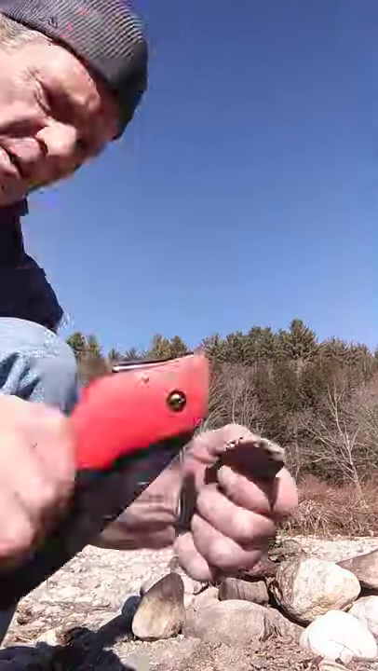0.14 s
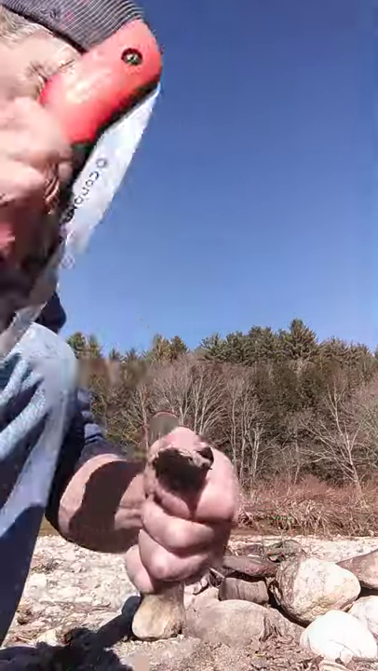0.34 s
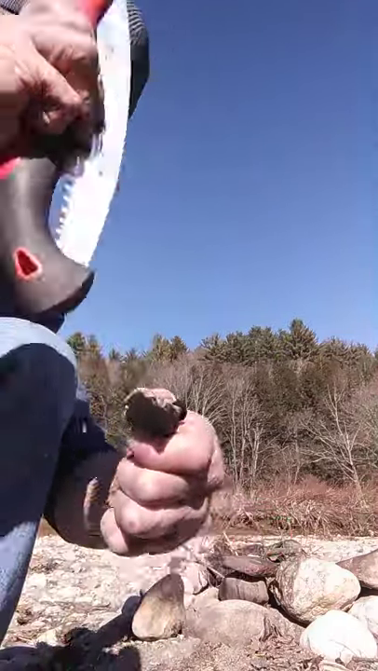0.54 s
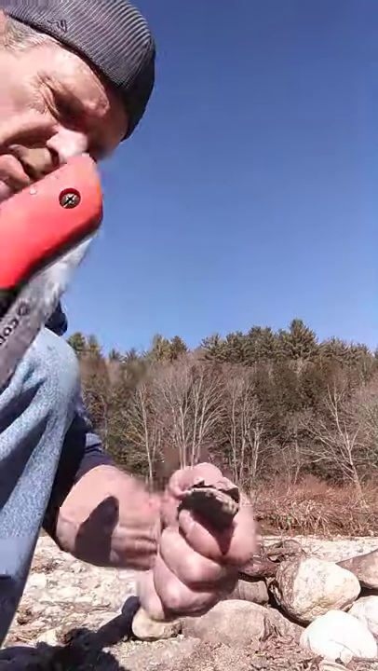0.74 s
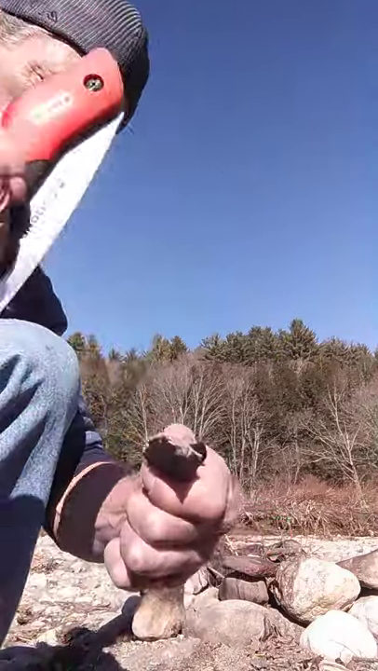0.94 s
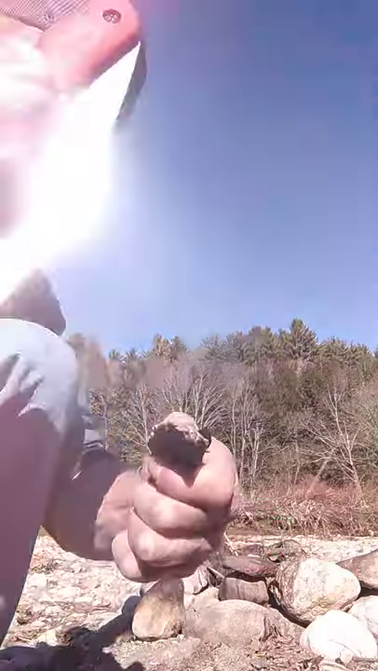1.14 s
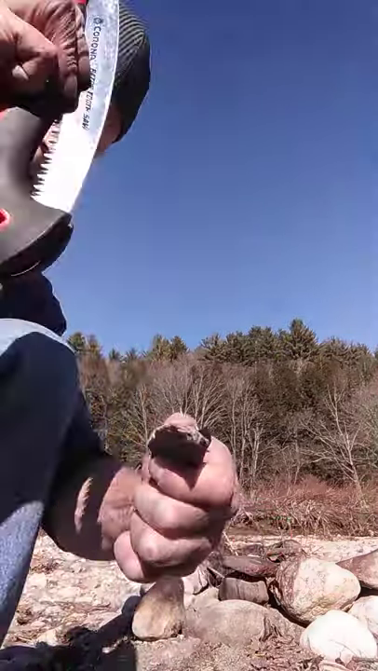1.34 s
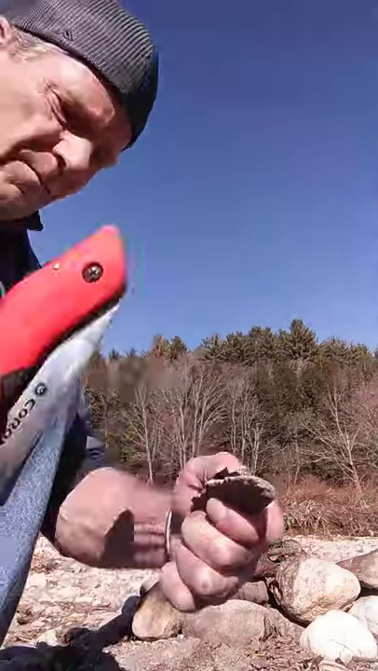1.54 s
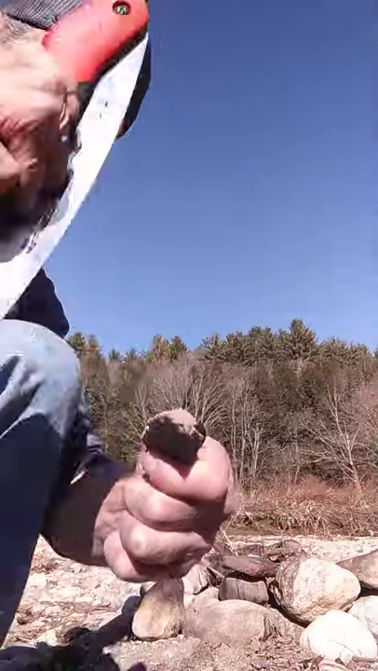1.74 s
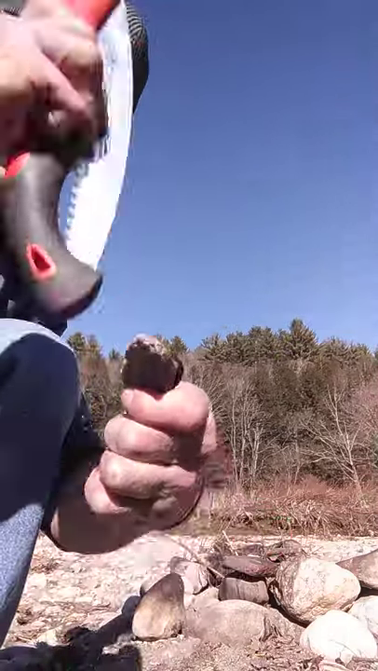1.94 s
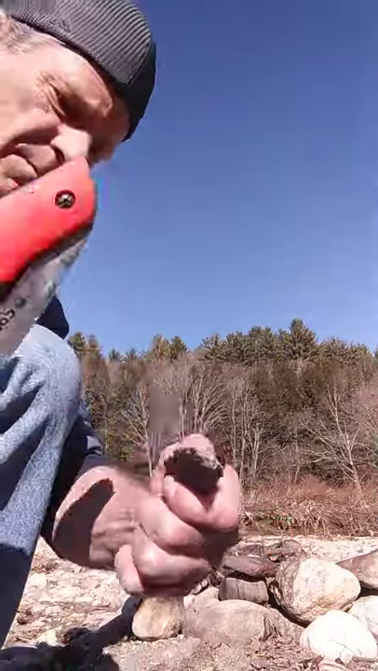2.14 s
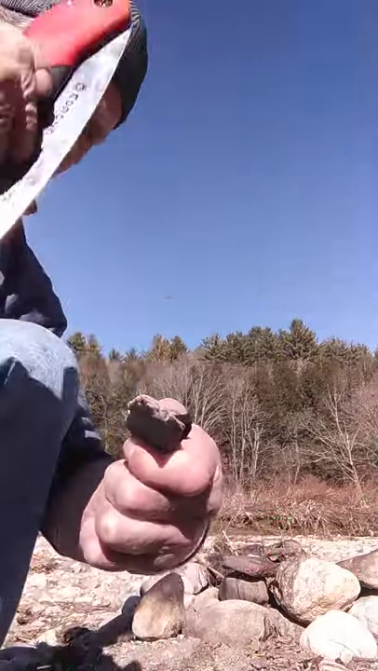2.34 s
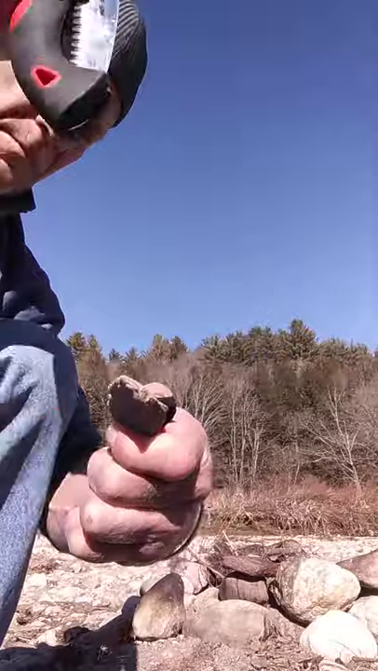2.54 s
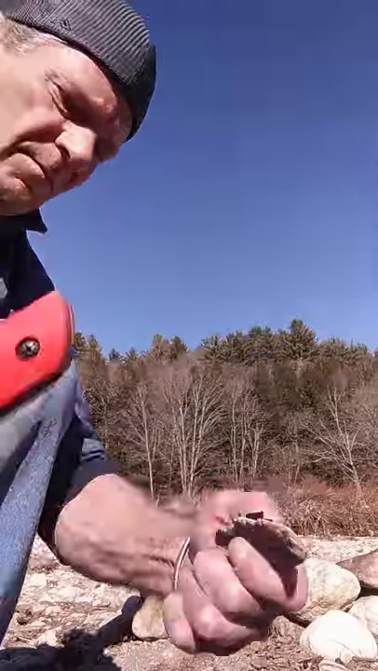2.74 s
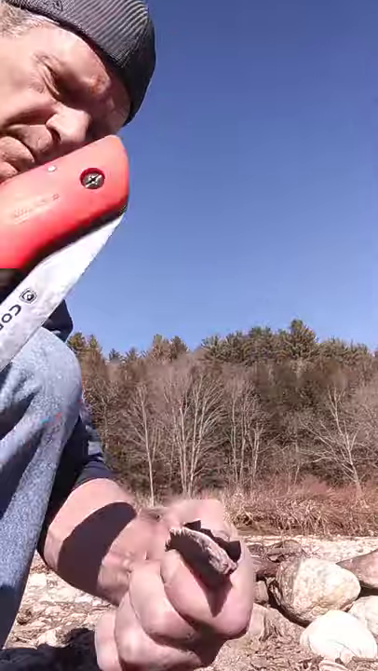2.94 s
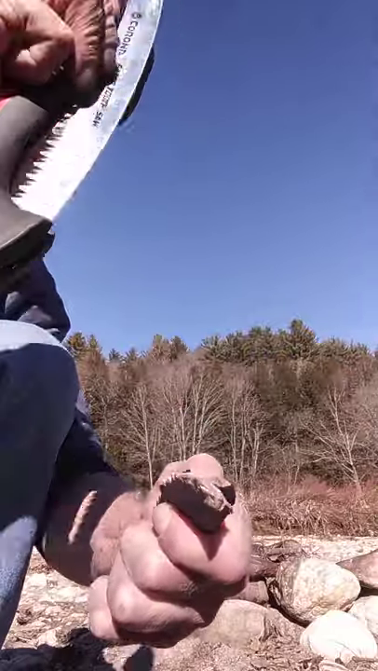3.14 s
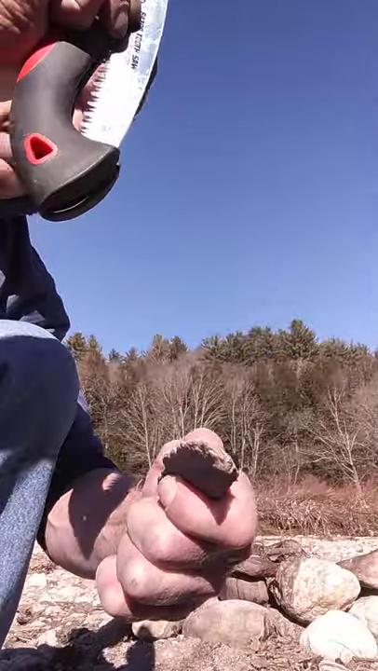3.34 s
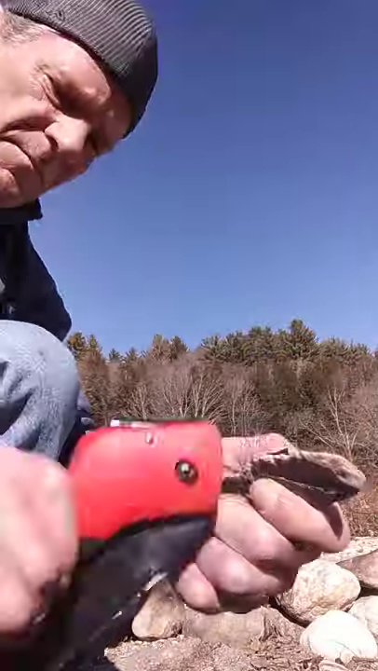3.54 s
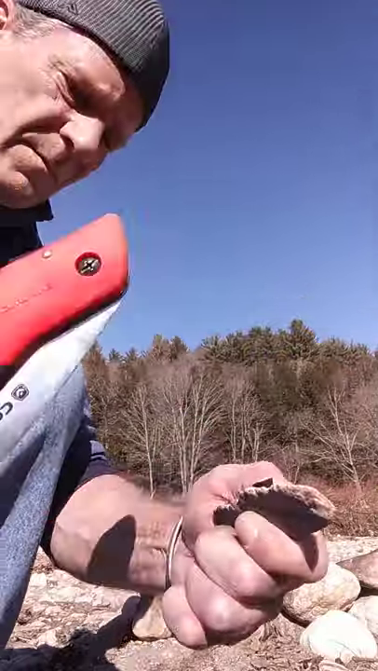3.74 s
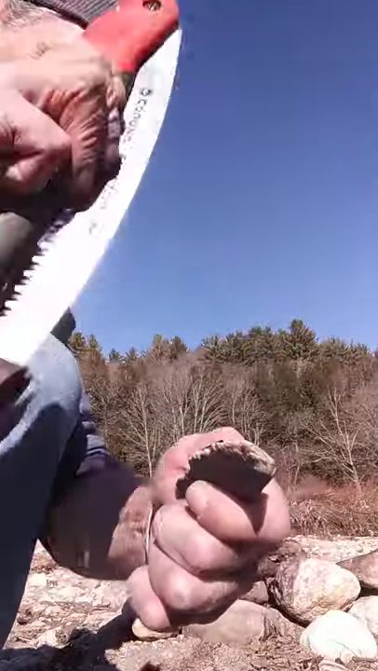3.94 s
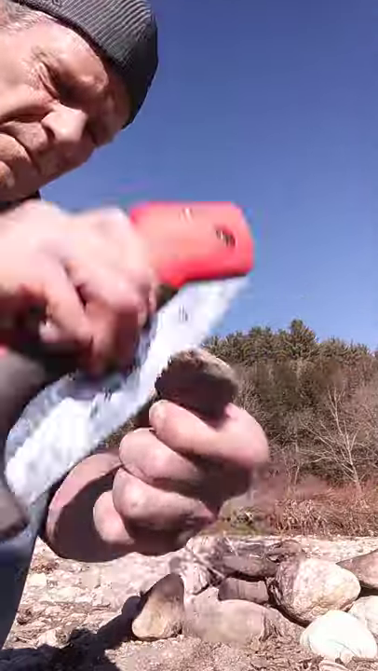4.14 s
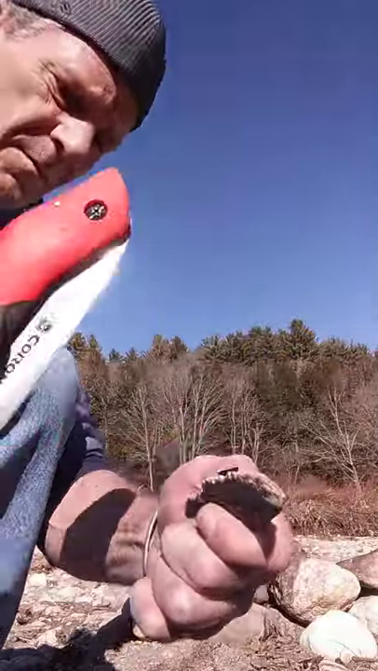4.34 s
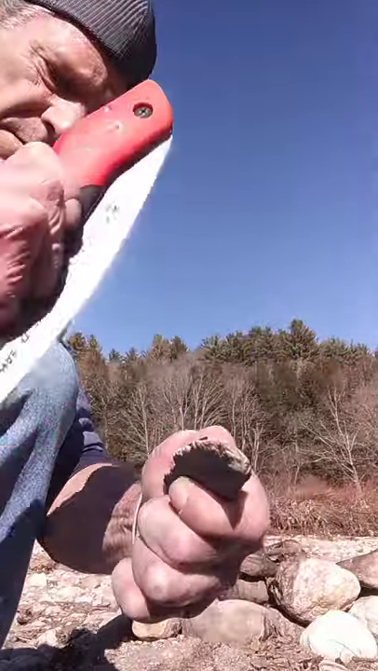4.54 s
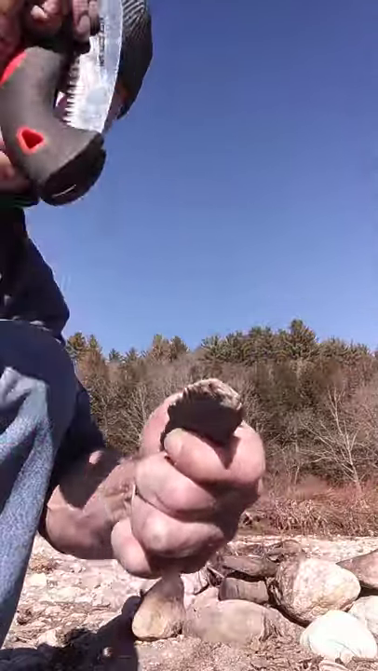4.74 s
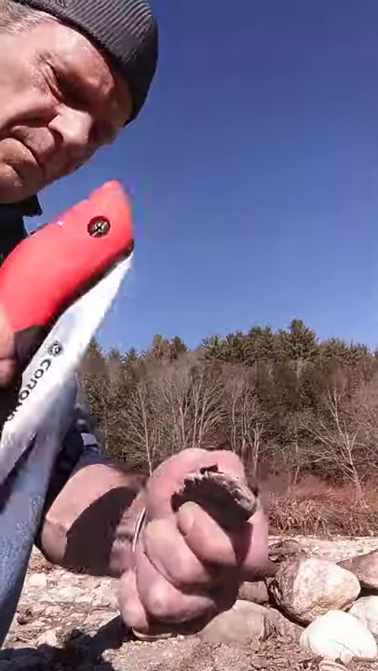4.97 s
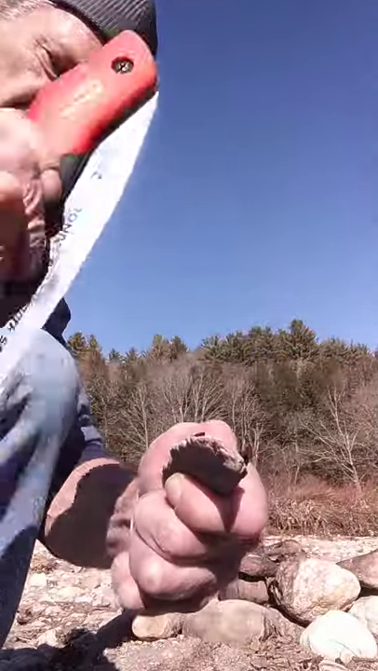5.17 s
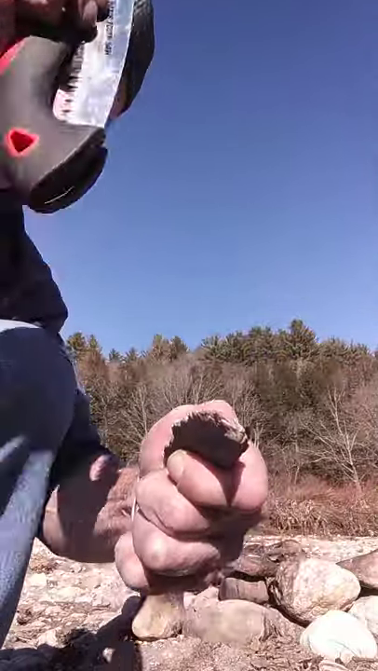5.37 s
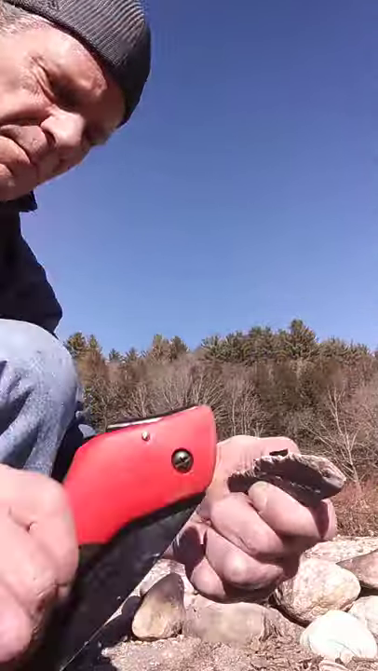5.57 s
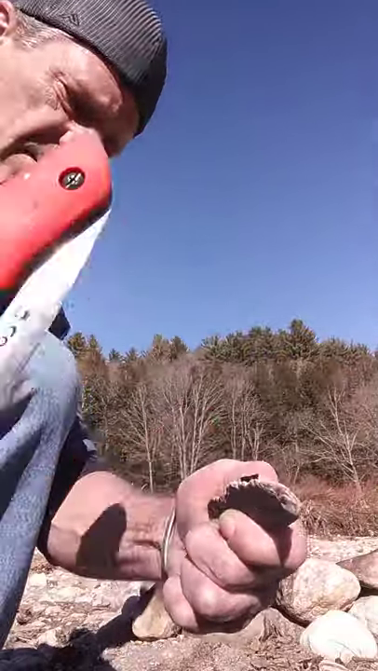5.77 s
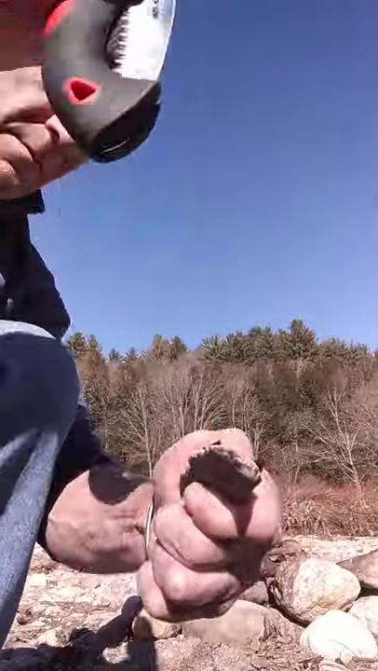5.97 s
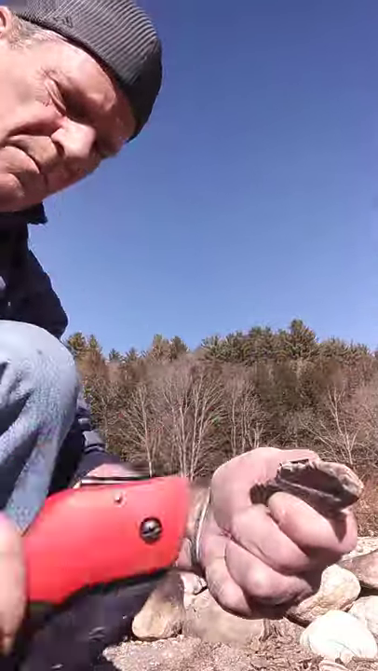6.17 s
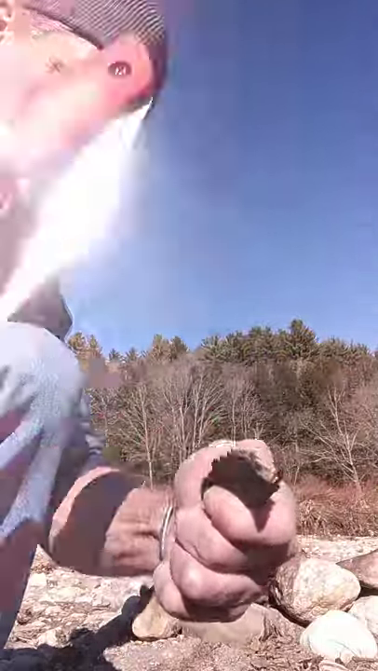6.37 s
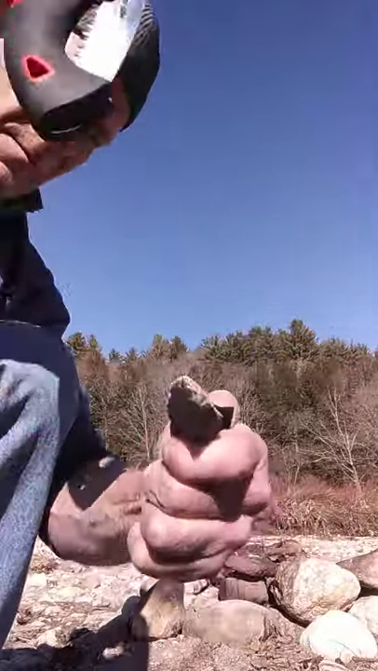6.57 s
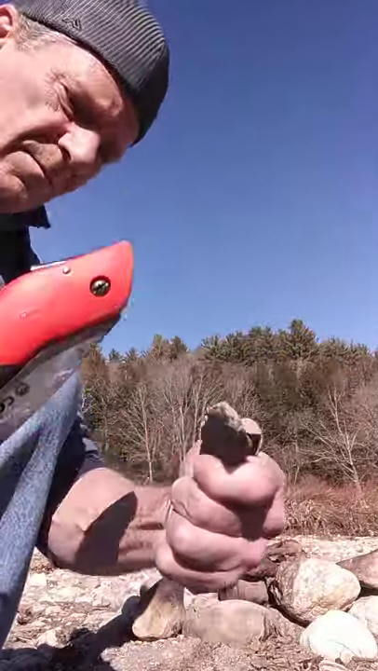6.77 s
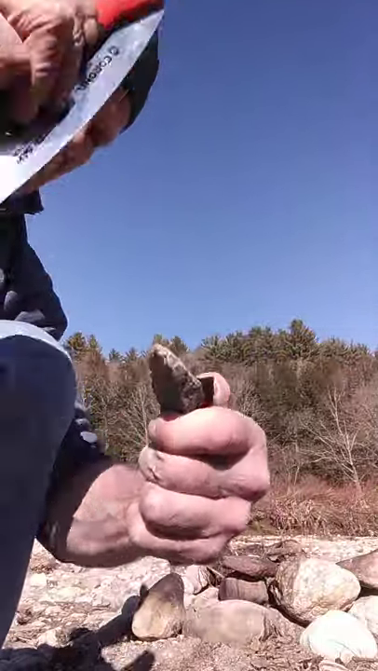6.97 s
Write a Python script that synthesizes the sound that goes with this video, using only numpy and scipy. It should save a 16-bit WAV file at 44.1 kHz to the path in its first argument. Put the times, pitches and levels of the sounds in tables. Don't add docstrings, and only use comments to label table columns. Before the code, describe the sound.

Eleven hard, overloaded strikes of a steel saw spine on hand-held flint, each a gritty scraping crack with stony ping, over a quiet river murmur.

```python
import sys
import numpy as np
from scipy import signal
from scipy.fft import rfft, irfft, next_fast_len
from scipy.io import wavfile
from scipy.ndimage import uniform_filter1d

SR = 44100
rng = np.random.default_rng(int(sys.argv[2]) if len(sys.argv) > 2 else 0)


def gain_from_db(level_db):
    decades = np.asarray(level_db, float) / 20
    return 10 ** decades


def put_to_file(sound):
    columns = np.atleast_2d(sound).T
    safe = np.clip(columns, -1, 1)
    whole_steps = np.round(safe * 32767)
    wavfile.write(sys.argv[1], SR, whole_steps.astype(np.int16))


N = 309141

# start in seconds, contact in seconds, spot on the flint (-1 thick
# to 1 thin), glance (0 to 1), flick in dB as the edge leaves.
STROKES = [(0.1769, 0.02, -.2, 0.03, 4), (.662, .025, -.3, 0.8, 2.5), (1.5002, 0.024, -.8, 0.6, -0.5),
           (2.0498, .026, 0.61, .05, 0.5), (2.702, 0.026, 0.05, 0.26, -1.5), (3.5813, .03, 0.19, 0.16, 0.5),
           (4.2185, 0.027, 0.6, .05, -6.5), (4.8943, .031, -.8, .6, 0.5), (5.6015, 0.025, 0.009, .9, -.5),
           (6.1909, 0.025, 0.27, 0.95, -4), (6.721, 0.026, .2, .6, .5)]
# start in seconds, force in dB, contact in seconds,
# spot on the flint (-1 thick to 1 thin), dullness in dB.
REBOUNDS = [(.696, -12.5, .003, -0.38, 5), (.7415, -45, 0.00079, -2, 11.5),
            (2.0976, -11, 0.0014, -1.2, 0.5), (2.7595, -33, 0.0024, 0.41, 16), (2.7819, -9, 0.011, 1, 1),
            (2.799, -18, .003, -.2, 0.5), (2.82, -46, 0.0095, 0, 17.5), (3.628, -38.5, .004, 0, 4),
            (3.634, -7.5, 0.0025, 0.2, 2.5), (4.251, -13, 0.0052, .7, 5.5), (4.26, -27, 0.0021, 0.011, -2),
            (4.946, -33.5, 0.0017, 0, 9), (6.225, -20.5, 0.0032, -.6, 9), (6.238, -21.5, 0.0029, -0.83, 7)]
STROKE_DB = -2.5


def colour(x, shape):
    hz, db = np.transpose(shape)
    bins = np.maximum(np.arange(2049) * SR / 4096, 1)
    ceps = irfft(np.interp(np.log(bins), np.log(hz), db) * np.log(10) / 20)
    ceps[1:2048] *= 2
    ceps[2049:] = 0
    return signal.fftconvolve(x, irfft(np.exp(rfft(ceps))))[:len(x)]


def unit(x):
    return x / np.sqrt(np.mean(x ** 2))


def band(x, lo_hz, hi_hz):
    sos = signal.butter(2, [lo_hz, min(hi_hz, .45 * SR)], "band", fs=SR, output="sos")
    return signal.sosfilt(sos, x)


def walk(rate):
    k = int(SR / rate)
    steps = np.repeat(rng.standard_normal(N // k + 1), k)
    return unit(uniform_filter1d(uniform_filter1d(steps, k), k)[:N])


def add(out, s, x):
    i = int(s * SR)
    out[i:i + len(x)] += x[:len(out) - i]


def mode(hz, t60, db, rise, split_hz=0):
    t = np.arange(int(1.5 * t60 * SR)) / SR
    swing = np.sin(2 * np.pi * hz * t)
    if split_hz > 0:
        swing = swing - .75 * np.sin(2 * np.pi * (hz + split_hz) * t)
    return gain_from_db(db - 60 * t / t60) * np.minimum(t / rise, 1) * swing


def contacts():
    strokes = [(s, STROKE_DB, contact, 0.042, 2.5 - 1.9 * glance) for s, contact, _, glance, _ in STROKES]
    rebounds = [(s, db, contact, 0.056, dull_db) for s, db, contact, _, dull_db in REBOUNDS]
    return sorted(strokes + rebounds)


def skids():
    # frequency in Hz, density in dB per Hz.
    grit_outline = [(88, -67.5), (150, -44), (606, -42), (1250, -23), (1780, -5.5), (2810, 0), (3160, -2.5),
                    (3490, -9), (4000, -5), (5590, 4), (6940, 0.5), (7810, -19), (15300, -39), (16500, -43)]
    pressed_hz = np.array([1800, 2600, 4100, 4800, 5600, 6400])
    out, t = np.zeros(N), np.arange(SR // 8) / SR
    rows = contacts()
    clicks = rng.standard_normal((len(rows), len(t)))
    clicks = clicks * gain_from_db(2.7 * rng.exponential(size=(len(rows), len(t))))
    spots = rng.standard_normal((len(rows), 2, len(pressed_hz)))
    for click, spot, (s, force_db, contact, lift, low_db) in zip(clicks, spots, rows):
        since_free = np.maximum(t - contact, 0)
        grit = unit(colour(click, grit_outline))
        for hz, db in zip(pressed_hz * (1 + .04 * spot[0]), -16 + 4 * spot[1]):
            grit = grit + gain_from_db(db) * unit(band(click, hz - 140, hz + 140))
        grit /= np.sqrt(uniform_filter1d(grit ** 2, size=200)) ** .58

        bite = np.exp(-t / 0.0032)
        press = gain_from_db(force_db - 60 * since_free / max(lift, .003)) * (1 + 1.2 * bite)
        press *= np.minimum(t / .0002, 1)

        low = gain_from_db(low_db) * band(grit, 100, 2023)
        mid = band(grit, 2300, 7200) * gain_from_db(-600 * since_free)
        bright = gain_from_db(2.5 - 0.85 * low_db) * (1 + .7 * np.exp(-t / 0.0074)) * band(grit, 7200, 25000)
        bright *= gain_from_db(-500 * since_free)
        add(out, s - .0004, press * (low + mid + bright))
    return out


def flint():
    # frequency in Hz, t60 in seconds.
    stone_modes = [(1700, .035), (4780, .052), (5585, .045), (6330, .03)]
    # dB after a stroke, dB after a rebound,
    # dB per spot, dB per glance.
    stone_answers = [(-12.5, -8.5, 1.6, -24), (-5.5, 0, -2.5, -1), (-7.5, -12.5, 5.5, 0),
                     (-8.5, -13.5, 4, 3.9)]
    free_after = .8
    out = np.zeros(N)
    for (hz, t60), (stroke_db, rebound_db, per_spot, per_glance) in zip(stone_modes, stone_answers):
        pings = []
        for s, contact, spot, glance, flick_db in STROKES:
            db = STROKE_DB + flick_db + stroke_db + per_spot * spot + per_glance * glance
            pings.append((s + free_after * contact, db))
        for s, force_db, _, spot, dull_db in REBOUNDS:
            db = force_db + rebound_db + per_spot * spot - 0.44 * dull_db
            pings.append((s + 0.0018, db))
        for s, db in pings:
            add(out, s, mode(hz, t60, db + 2, rise=.0035))
    return out


def blade():
    # frequency in Hz, level in dB within its family, t60 in seconds,
    # split in Hz.
    families = [
        [(2381, 0, .52, 0), (1933, -9, .3, 0), (894, -9, .25, 0)],
        [(4118, -2, .19, 0), (3994, -8, .16, 0), (4231, -6, .2, 0), (3500, -10, .14, 0), (2159, 0, .15, 0)],
        [(4560, -5, 1.0, 4.5), (4334, -12, .35, 0)],
        [(5093, 4, .27, 0), (5658, -1, .2, 0), (4845, 0, .14, 0)],
        [(6019, 0, .8, 0), (5728, 0, .3, 0)],
    ]
    # dB for a stroke in the middle, dB per step to the tip, dB per twist,
    # dB per step to the spine.
    family_answers = [(-36, .8, 1.5, -0.5), (-24, 0.5, -0.95, -0.8), (-51.5, 9.5, -0.1, 0.3),
                      (-44, -0.6, 7.5, 1), (-55, 0.1, -1.3, 5)]
    blade_spots = [(-1.1, .9, 0.87), (.3, 0.66, -0.97), (-.2, -0.13, -.3), (-.4, 0.11, 1),
                   (0.29, -0.92, -1), (-.6, -.3, .8), (0.62, -.9, -2), (0.27, 1.1, .3), (1.18, -0.048, .2),
                   (0.44, -0.082, 1), (0.17, -0.06, 0.78)]
    out = np.zeros(N)
    flexes = 1 + .001 * rng.standard_normal(len(STROKES))
    for (s, *_), spot, flex in zip(STROKES, blade_spots, flexes):
        for family, (middle_db, *per_step_db) in zip(families, family_answers):
            family_db = middle_db + np.dot(per_step_db, spot)
            for hz, db, t60, split_hz in family:
                add(out, s, mode(hz * flex, t60, family_db + db, rise=0.0011, split_hz=split_hz))
    return out


def chips():
    # start in seconds, peak in dB, pitch in Hz.
    landings = [(.298, -49, 8000), (0.342, -21, 2830), (.413, -44, 4000), (.4905, -40.5, 3000),
                (.8795, -40.5, 2800), (.973, -44.5, 3480), (2.7805, -18, 5000), (2.969, -40.5, 2350),
                (2.993, -39.5, 8040), (3.759, -36.5, 9600), (3.765, -42, 1900), (4.699, -40.5, 2560),
                (4.717, -49, 2000), (5.06, -43.5, 8000), (5.595, -31, 4900), (5.747, -51, 7000),
                (6.1643, -36, 5550), (6.173, -59, 7000), (6.2571, -13.5, 3220), (6.276, -43, 8000),
                (6.521, -42.5, 3550), (6.812, -38, 5000), (6.8241, -10, 2500), (6.841, -45, 3980),
                (6.854, -47, 6500), (6.869, -36.5, 4000), (6.933, -38.5, 5950)]
    out, t = np.zeros(N), np.arange(600) / SR
    dull = signal.butter(2, 7200, fs=SR, output="sos")
    fade = gain_from_db(-60 * np.maximum(t - .0015, 0) / 0.005)
    cracks = rng.standard_normal((len(landings), len(t)))
    for (s, db, hz), crack in zip(landings, cracks):
        width = 1.35 + .014 * (db + 40)
        spread = np.exp(np.clip(width, .1, 3) / 2)
        snap = 4.0 * (np.arange(len(t)) == 12) + crack * fade
        tick = signal.sosfilt(dull, band(snap, hz / spread, hz * spread))
        tick = tick + .7 * np.roll(tick, shift=13)
        add(out, s, gain_from_db(db) * tick / np.abs(tick).max())
        knock_db = -7 - 21 * np.log2(hz / 3000)
        add(out, s + .0012, mode(1150, .009, db + knock_db, rise=.0008))
    return out


def far_bank(x):
    t = np.arange(SR) / SR
    wash = rng.standard_normal(SR) * gain_from_db(-60 * t / 0.17) * np.minimum(t / 0.018, 1)
    dull = signal.sosfilt(signal.butter(1, 918.4, fs=SR, output="sos"), wash)
    return gain_from_db(-35.5) * signal.fftconvolve(x, dull / np.linalg.norm(dull))[:N]


def river():
    # frequency in Hz, density in dB per Hz.
    water_outline = [(35, -80), (60, -53), (154, -26.5), (194, -12.5), (326, 0), (442, -3), (586, -1.5),
                     (961, -7), (1160, -17), (1370, -18), (3340, -24), (4860, -19), (7960, -31.5),
                     (15000, -41.5), (16500, -34.5)]
    surge_s, surge_width_s, surge_db = 1.4, 0.18, 2
    t = np.arange(N) / SR
    murmur_db = -55 + surge_db * np.exp(-((t - surge_s) / surge_width_s) ** 2)
    hiss_db = -51.5
    murmur, hiss = np.zeros(N), np.zeros(N)
    for hz in 62 * 2 ** np.arange(0, 8.6, .5):
        water = band(rng.standard_normal(N), hz / 2 ** .25, hz * 2 ** .25) * gain_from_db(1.2 * walk(14))
        if hz < 1200:
            murmur += water
        else:
            hiss += water
    low, high = colour(murmur, water_outline), colour(hiss, water_outline)
    return (low * gain_from_db(murmur_db) + high * gain_from_db(hiss_db)) / np.std(band(low, 330, 820))


def let_up():
    open_db, close_s = 5.5, 0.18
    since = np.arange(N) / SR - np.array(STROKES)[:, :1]
    return gain_from_db(open_db * np.sum((since > 0) * np.exp(-np.abs(since) / close_s), axis=0))


def scene():
    blows = skids() + flint()
    mono = blows + blade() + chips() + far_bank(blows) + let_up() * river()
    return np.tile(mono, (2, 1))


def low_pass(x):
    return signal.sosfilt(signal.butter(12, 16920, fs=SR, output="sos"), x)


def record(dry):
    ceiling, bass_cut_hz, top_hz = .69, 70, 16100
    swing = np.abs(signal.hilbert(dry, next_fast_len(N)))[:, :N]
    held = dry / (1 + (swing / ceiling) ** 8) ** (1 / 8)
    held = signal.lfilter(*signal.butter(1, bass_cut_hz, "high", fs=SR), held)
    mix = signal.sosfilt(signal.ellip(8, .2, 70, top_hz, fs=SR, output="sos"), held)
    return low_pass(mix)


dry = scene()
out = record(dry)
put_to_file(out)
```